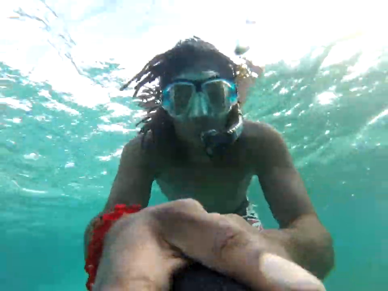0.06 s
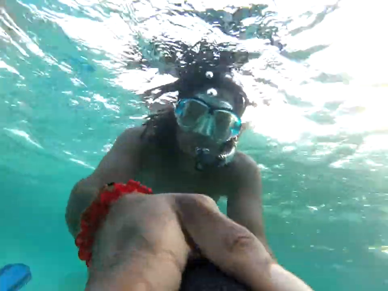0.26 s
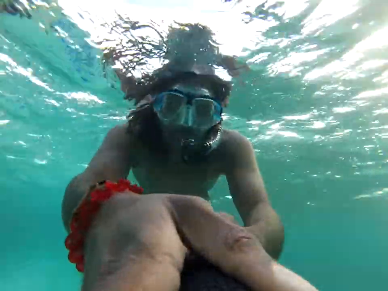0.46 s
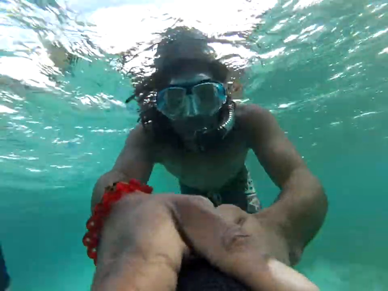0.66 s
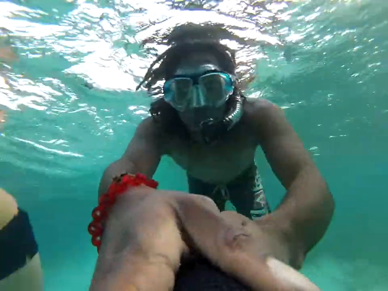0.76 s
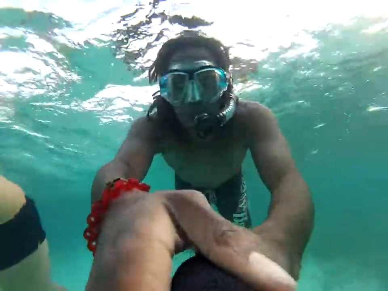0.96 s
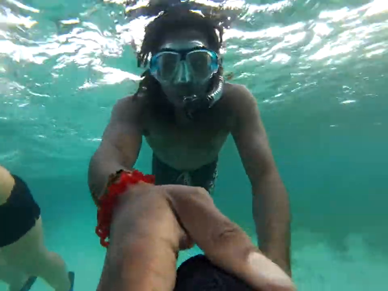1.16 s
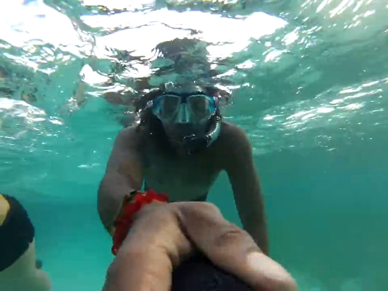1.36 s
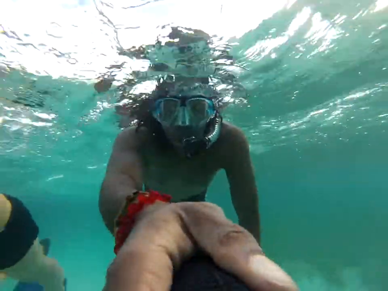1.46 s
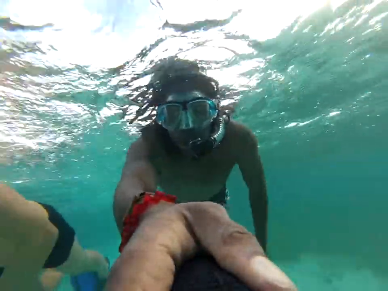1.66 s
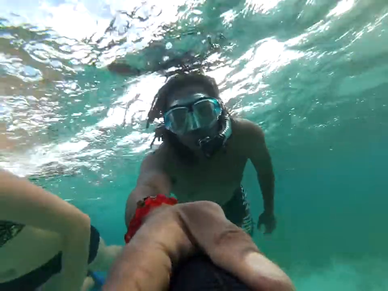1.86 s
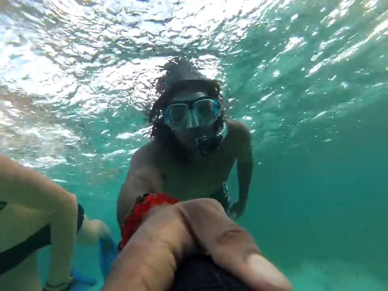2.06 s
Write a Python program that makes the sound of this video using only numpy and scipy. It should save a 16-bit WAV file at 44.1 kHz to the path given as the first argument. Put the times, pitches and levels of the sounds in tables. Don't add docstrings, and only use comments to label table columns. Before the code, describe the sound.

Muffled underwater rumble from a microphone sealed in a camera housing, towed through shallow sea. Deep uneven heaves and low pole wobbles run from the start, with small bubble gulps. A hard bright snap lands at 0.13 s. The heaviest surge comes around 1.05-1.15 s with faint crackles, then a knock at 1.36 s. Closer bubbling and tiny grit ticks follow until 1.6 s, then it calms over faint hiss.

```python
import sys
import numpy as np
from scipy import signal
from scipy.fft import rfft, irfft, next_fast_len
from scipy.io import wavfile
from scipy.ndimage import uniform_filter1d

SR = 44100
rng = np.random.default_rng(int(sys.argv[2]) if len(sys.argv) > 2 else 0)


def elevation(decibels):
    levels = np.asarray(decibels, float)
    return 10 ** (levels / 20)


def digitize_waveform(pressure):
    field = np.atleast_2d(pressure).T
    bounded = np.clip(field, -1, 1)
    quanta = np.round(bounded * 32767).astype(np.int16)
    wavfile.write(sys.argv[1], SR, quanta)


N = 93315


def in_time(rows):
    s, *columns = np.transpose(rows)
    return [np.interp(np.arange(N) / SR, s, column) for column in columns]


def rms_one(x):
    return x / np.sqrt(np.mean(x ** 2) + 1e-20)


def cut(x, hz, kind, order=2):
    return signal.sosfilt(signal.butter(order, hz, kind, fs=SR, output="sos"), x)


def noise(low_hz, high_hz):
    return rms_one(cut(rng.standard_normal(N + SR), [low_hz, high_hz], "band")[SR:])


def resonate(x, hz, width_hz, db):
    r = np.exp(-np.pi * width_hz / SR)
    b = (1 - r * r) / 2 * np.array([1, 0, -1])
    a = [1, -2 * r * np.cos(2 * np.pi * hz / SR), r * r]
    return elevation(db) * signal.lfilter(b, a, signal.lfilter(b, a, x))


def add(out, s, db, hz, t60, rise_s=0., hold_s=0., glide=0.):
    t = np.arange(int(.3 * SR)) / SR
    rise = 1 - np.exp(-t / (rise_s + 1e-5))
    decay = elevation(-60 * np.maximum(t - rise_s - hold_s, 0) / t60)
    tone = np.sin(2 * np.pi * hz * t * (1 + glide * t / t60))
    start = int(s * SR)
    out[start:start + len(t)] += elevation(db) * rise * decay * tone


def heaves():
    # start_s, peak_db, pitch_hz
    heave_rows = [
        (-.004, -20, 24.6),
        (0.102, -24, 59),
        (0.257, -19.5, 23.4),
        (0.317, -24, 45),
        (0.423, -24.5, 15.3),
        (0.963, -32.5, 24.5),
        (1.055, -10.5, 17.4),
        (1.264, -19, 21.6),
        (1.583, -31, 21.3),
    ]
    out = np.zeros(N + 2 * SR)
    for s, db, hz in heave_rows:
        add(out, s + 1, db, hz, t60=4.8 / hz, hold_s=.5 / hz)
    return out[SR:SR + N]


def swell():
    # time_s, level_db
    pressure = [(0.0, -28), (0.06, -28.5), (0.28, -24.5), (0.68, -38.5), (0.78, -26.5), (0.84, -42),
                (0.87, 0), (0.93, -55), (0.98, 0), (1.01, -27), (1.1, -9), (1.15, -25.5), (1.28, -27.5),
                (1.41, -31.5), (1.48, -31.5), (1.55, -47.5), (1.58, -37), (2.12, -41.5)]
    top_db, even_s = -25, 0.018
    wobble_hz, wobble_width_hz, wobble_db = 98, 59, -17
    db = np.minimum(in_time(pressure)[0], top_db)
    slow = noise(10, 35)
    power = uniform_filter1d(slow ** 2, int(even_s * SR))
    slow = rms_one(slow / np.sqrt(power + 0.028))
    wobble = rms_one(resonate(noise(51, 180), wobble_hz, wobble_width_hz, 0))
    return cut(elevation(db) * slow, 50, "low") + elevation(db + wobble_db) * wobble


def ringing_water(peaks, more, wash):
    gurgles_per_s, spread_db, flicker_db = 380, 2.5, 2.5
    sizes = elevation(spread_db * np.minimum(rng.exponential(1, N), 4)) * rng.choice([-1, 1], N)
    gurgles = rms_one(sizes * (rng.random(N) < more * gurgles_per_s / SR))
    flicker = elevation(flicker_db * noise(9, 20))
    drive = (gurgles + wash * rng.standard_normal(N)) * flicker
    return rms_one(sum(resonate(np.roll(drive, k * N // 7), *peak) for k, peak in enumerate(peaks)))


def flow():
    # time_s, level_db, brightness_db, fizz_db, slosh_db
    stream = [(0, -45, -22.5, -32, -8), (.2, -46, -17, -36.5, -18.5), (.3, -53, -16, -15.5, -21),
              (.5, -45.5, -22.5, -30, -22), (.58, -50.5, -15.5, -26.5, -3), (.75, -43.5, -15, -26.5, -9),
              (.82, -50, -20, -24.5, -5), (.89, -44, -13.5, -32.5, -20), (1.0, -48, -20.5, -18, -13),
              (1.11, -38, -20.5, -41, -20), (1.16, -52.5, -18.5, -21, -14), (1.3, -37, -19, -34, -9.5),
              (1.4, -41.5, -20, -22.5, -23), (1.53, -43, -12.5, -20, -12.5),
              (1.62, -50.5, -13, -20.5, -6.5), (1.8, -48, -20, -22.5, -13.5),
              (1.96, -50, -19.5, -21, -12.5), (2.12, -55, -11, -14, -1.5)]
    # pitch_hz, width_hz, level_db
    shell_low = [(354, 200, -30.5), (416, 90, -2.5), (501.2, 86, 3), (593.5, 124, -1), (820, 160, -20.5)]
    # pitch_hz, width_hz, level_db
    shell_high = [(1120, 250, -5), (1543, 320, 5), (2131, 630, 5), (2658, 290, -1.5), (2997, 1900, -7.5)]
    # pitch_hz, width_hz, level_db
    cavity = [(3450, 2300, 5.5), (5501, 1000, 5.5), (7390, 1800, 5.5), (10070, 1300, -0.5),
              (11600, 690, 3.2)]
    # pitch_hz, width_hz, level_db
    hollow = [(197, 81, -4.5), (286, 220, -0.5)]
    db, bright_db, fizz_db, slosh_db = in_time(stream)
    body = ringing_water(shell_low, more=1, wash=1.4)
    bright = elevation(bright_db) * ringing_water(shell_high, more=1.5, wash=1.1)
    fizz = elevation(fizz_db) * ringing_water(cavity, more=.6, wash=.8)
    slosh = elevation(slosh_db) * ringing_water(hollow, more=.3, wash=1.2)
    return elevation(db) * (body + bright + fizz + slosh)


def hiss():
    # pitch_hz, level_db (per Hz)
    hiss_colour = [(150, 20.5), (700, 3), (1300, 2), (3000, -4.5), (6000, -6), (10000, -8), (13000, -8),
                   (16000, -16)]
    level_db = -69.5
    hz, db = np.transpose(hiss_colour)
    size = next_fast_len(N)
    bins_hz = np.arange(size // 2 + 1) * SR / size
    colour = elevation(np.interp(np.log(bins_hz + 1), np.log(hz), db))
    out = irfft(rfft(rng.standard_normal(size)) * colour, size)[:N]
    out = out / np.std(cut(out, 2730, "high"))
    return elevation(level_db) * cut(out, 84, "high")


def whine():
    # start_s, length_s, tone_db, hash_db
    whines = [
        (0.018, 0.057, -91, -72.5),
        (0.318, 0.043, -93, -73),
        (0.525, 0.059, -89, -71.5),
        (0.821, 0.063, -89, -72.5),
        (1.12, 0.038, -91, -73),
        (1.186, 0.061, -93, -73.5),
        (1.273, 0.039, -63.5, -71),
    ]
    whine_hz, wander_hz = 10200, 110
    t = np.arange(N) / SR
    tone, hash_level = np.zeros(N), np.zeros(N)
    for s, length_s, tone_db, hash_db in whines:
        gate = np.clip(np.minimum(t - s, s + length_s - t) / .002, 0, 1)
        tone += elevation(tone_db) * gate
        hash_level += elevation(hash_db) * gate
    phase = 2 * np.pi * np.cumsum(whine_hz + wander_hz * noise(5.7, 150)) / SR
    return tone * np.sin(phase) + hash_level * noise(9800, 10900)


def gulps():
    # start_s, peak_db, pitch_hz, length_s
    gulp_rows = [(.037, -48, 503, 0.0087), (.081, -40, 470, .006), (.122, -38.5, 460, .006),
                 (.223, -42.5, 627, 0.002), (.271, -48, 400, .004), (.296, -43.5, 589, 0.0064),
                 (.408, -50, 433, .006), (.634, -40.5, 413, 0.0037), (.754, -41.5, 622, 0.0094),
                 (1.282, -49, 395, 0.0062), (1.498, -28, 541, .004), (1.65, -44.5, 411, .005),
                 (1.827, -62, 557, 0.0033), (1.853, -45.5, 598, 0.0065), (1.888, -43, 536, 0.0063),
                 (2.075, -41.5, 494, .004), (0.169, -42.5, 579, 0.0033), (0.352, -39.5, 589, 0.0058),
                 (0.47, -42.5, 524, 0.031), (0.738, -44, 468, 0.012), (0.873, -40, 510, 0.025),
                 (1.055, -35, 641, 0.0029), (1.097, -36, 438, 0.004), (1.192, -31, 460, 0.0043),
                 (1.227, -27.5, 507, 0.0015), (1.239, -40.5, 554, 0.029), (1.318, -41, 567, 0.0053),
                 (1.38, -25, 458, 0.0033), (1.442, -28, 447, 0.0048), (1.446, -38.5, 550, 0.013),
                 (1.488, -38, 531, 0.014), (1.528, -30, 496, 0.027), (1.557, -30.5, 415, 0.0019),
                 (1.588, -34.5, 523, 0.0049), (1.686, -41, 476, 0.012), (1.934, -36, 482.6, 0.009),
                 (1.967, -36.5, 563, 0.0023)]
    out = np.zeros(N + SR)
    for s, db, hz, length_s in gulp_rows:
        add(out, s, db, hz, t60=0.068, rise_s=0.0033, hold_s=length_s, glide=0.051)
    return out[:N]


def pole():
    # start_s, peak_db, pitch_hz, length_s
    jolts = [(0.05, -21.5, 78.5, 0.0075), (0.211, -23.5, 90.9, 0.014), (0.325, -26, 94, 0.0097),
             (0.412, -23.5, 87.4, 0.0023), (0.449, -23, 98.5, 0.0075), (.678, -20, 91.4, 0.021),
             (0.761, -28, 98.3, 0.025), (0.867, -23, 91, 0.013), (0.907, -24.5, 101, 0.02),
             (0.524, -35, 100, 0.0036), (.555, -35.5, 92, 0.013), (0.63, -32.5, 95, .015),
             (0.154, -31, 89, 0.0067), (1.035, -37, 103, 0.043), (1.106, -15, 98, 0.0029),
             (1.261, -22.5, 82.3, 0.023), (1.293, -24, 102.5, 0.024), (1.3533, -17.5, 97.4, 0.0083),
             (1.56, -32.5, 94.4, 0.0055), (2.071, -39.5, 123, 0.062), (1.968, -48.5, 98, 0.036)]
    out = np.zeros(N + SR)
    for s, db, hz, length_s in jolts:
        add(out, s, db, hz, t60=0.11, rise_s=0.0038, hold_s=length_s)
    return out[:N]


def knocks():
    # start_s, peak_db
    snap = [
        (.1228, -38),
        (.1342, -9),
        (.1349, -50),
    ]
    # pitch_hz, level_db, t60_s
    snap_modes = [(2230, -3, 0.0068), (2094, -18, 0.048), (1500, -53, 0.021), (3080, -21, 0.0013),
                  (592, -19, 0.021)]
    # start_s, peak_db
    knock = [
        (1.3563, -29.5),
        (1.3576, -26.5),
        (1.3588, -17),
    ]
    # pitch_hz, level_db, t60_s
    knock_modes = [(1520, 2.5, 0.0059), (2120, 1.5, 0.0066), (2520, -10, 0.0021), (742, -5, 0.0069),
                   (580, 5, 0.02), (3240, -22, 0.011), (1195, -11.5, 0.0048)]
    out = np.zeros(N + SR)
    for hits, modes in ((snap, snap_modes), (knock, knock_modes)):
        for s, db in hits:
            for hz, mode_db, t60 in modes:
                add(out, s, db + mode_db, hz, t60, rise_s=.0009)
    return cut(out, 3380, "low", order=4)[:N]


def ticks():
    # start_s, peak_db, pitch_hz
    tick_rows = [(.1345, -49.5, 5250), (.151, -50, 11800), (1.542, -42, 4360), (.2925, -44.5, 11600),
                 (0.2935, -48, 5250), (.3335, -46, 12100), (0.344, -51, 7000), (1.139, -49, 7640),
                 (1.137, -48, 4220), (1.248, -47, 5430), (1.264, -48, 7200), (1.422, -49, 9850),
                 (1.889, -44, 11300), (2.031, -49, 11200), (2.076, -48, 7450), (2.068, -56, 7200),
                 (2.072, -60, 7500), (2.077, -55.5, 5000), (2.0895, -49, 5000), (2.069, -55, 3740),
                 (2.091, -49, 3800), (1.416, -53, 7600), (1.43, -55, 7300), (1.443, -51, 7550),
                 (1.454, -54, 8000), (1.461, -50, 5800), (1.435, -64, 5700), (1.475, -59, 7600),
                 (1.48, -67.5, 3800), (1.456, -51, 3750), (1.485, -51, 5200), (1.51, -52, 7800),
                 (1.525, -55, 4550), (1.529, -50, 7000), (1.5355, -52, 4350), (1.542, -45.5, 7100),
                 (1.549, -54, 7000), (1.573, -52, 7500), (1.59, -55, 7800), (1.6, -54, 7500),
                 (2.09, -47, 11700)]
    out = np.zeros(N + SR)
    for s, db, hz in tick_rows:
        add(out, s, db, hz, t60=0.0032, rise_s=.0003)
    return out[:N]


def pops():
    # start_s, peak_db, pitch_hz
    pop_rows = [(0.547, -54, 2600), (0.733, -36, 169), (.225, -46.5, 760), (.802, -53, 3500),
                (1.029, -63, 3710), (1.128, -45, 1150), (1.117, -47.5, 1380), (1.181, -39, 617),
                (1.189, -49.5, 2030), (1.5128, -47, 3740), (1.5342, -48, 3760), (1.541, -43.5, 3840),
                (1.538, -40.5, 2210), (1.534, -48, 7760), (1.56, -40, 296), (1.575, -42.5, 2050),
                (1.672, -43.5, 2250), (1.68, -39.5, 2230), (1.821, -51, 1500), (1.852, -37, 785),
                (1.927, -50, 3600), (1.952, -51, 2080), (1.986, -46, 788), (2.08, -43, 3820),
                (2.099, -42, 790)]
    out = np.zeros(N + SR)
    for s, db, hz in pop_rows:
        add(out, s, db, hz, t60=46 / hz ** 0.8 / 5, rise_s=.001, glide=0.021)
    return out[:N]


def clicks():
    # start_s, peak_db
    click_rows = [
        (1.1003, -35),
        (1.1028, -40),
        (1.1175, -41),
        (1.1192, -36),
        (1.136, -41),
    ]
    out = np.zeros(N)
    for s, db in click_rows:
        start = int(s * SR)
        out[start:start + 40] += elevation(db) * .8 ** np.arange(40)
    return out


def scene():
    water = heaves() + swell() + flow() + gulps() + pops()
    contacts = pole() + knocks() + ticks()
    microphone = hiss() + whine() + clicks()
    return (water + contacts + microphone)[None]


def low_pass(x):
    return signal.sosfilt(signal.butter(12, 15290, fs=SR, output="sos"), x)


def record(dry):
    return low_pass(dry)


dry = scene()
out = record(dry)
digitize_waveform(out)
```